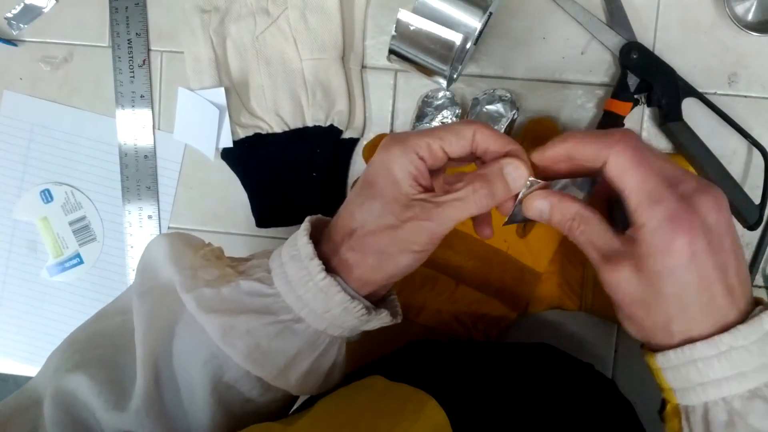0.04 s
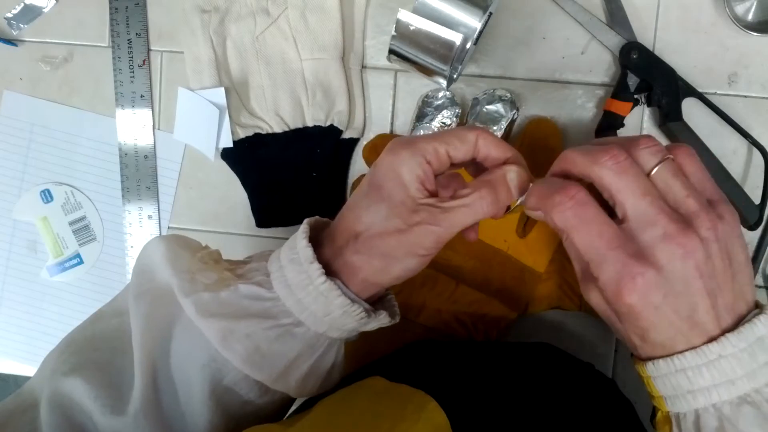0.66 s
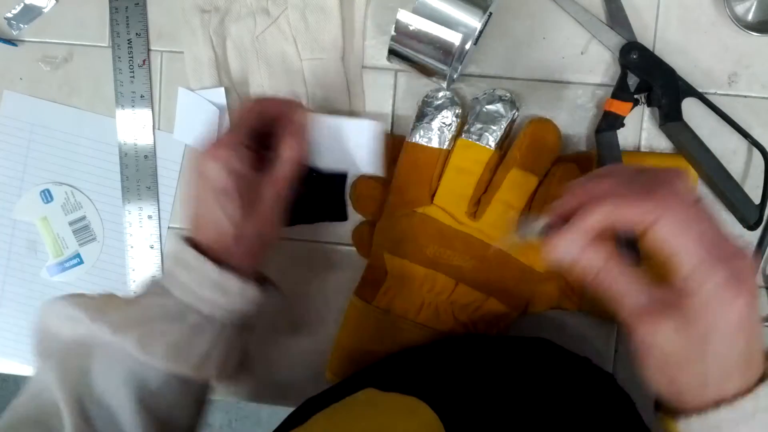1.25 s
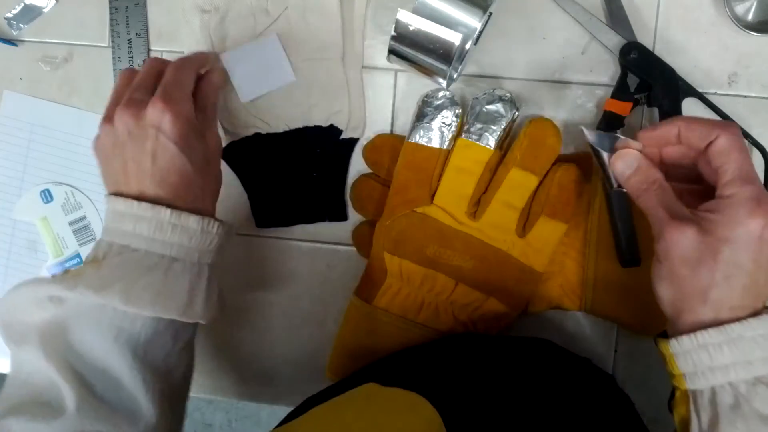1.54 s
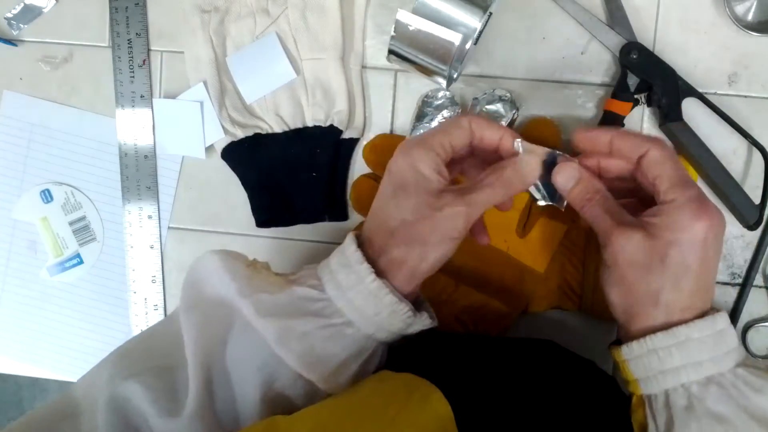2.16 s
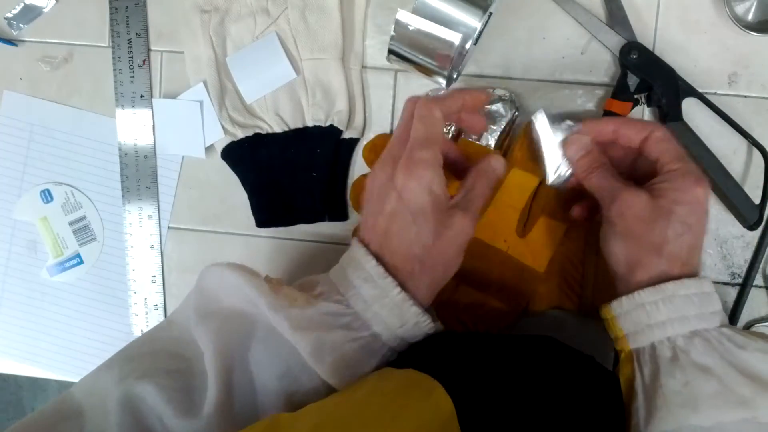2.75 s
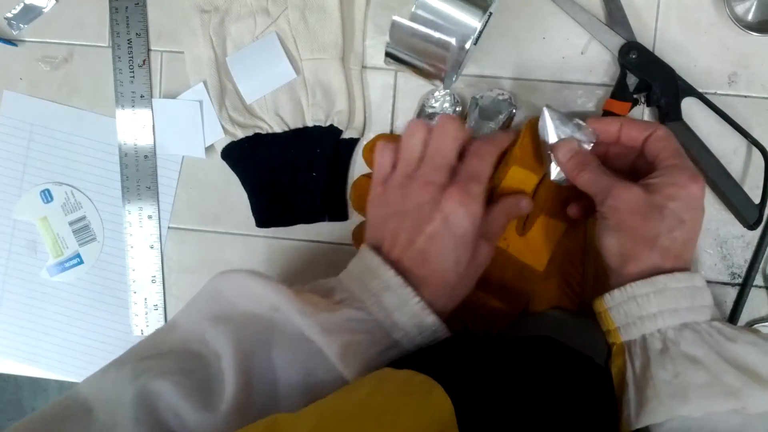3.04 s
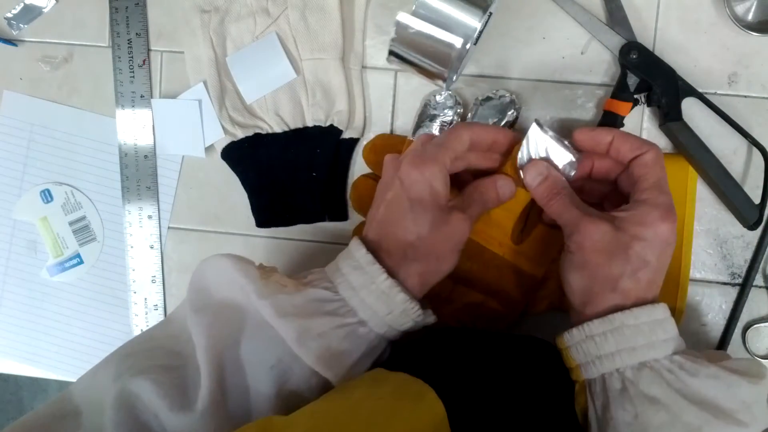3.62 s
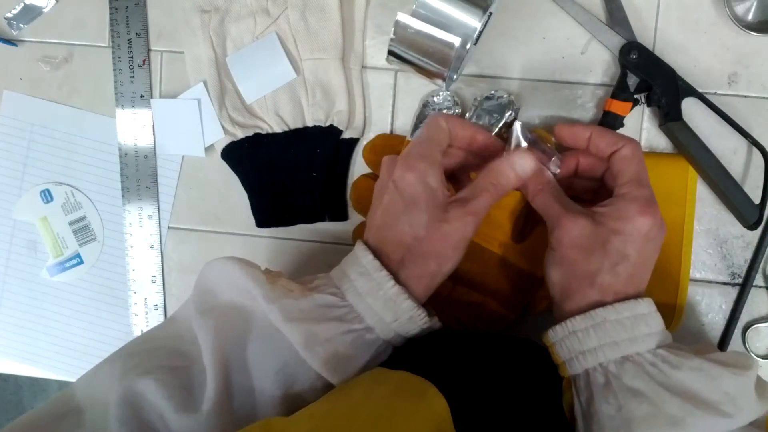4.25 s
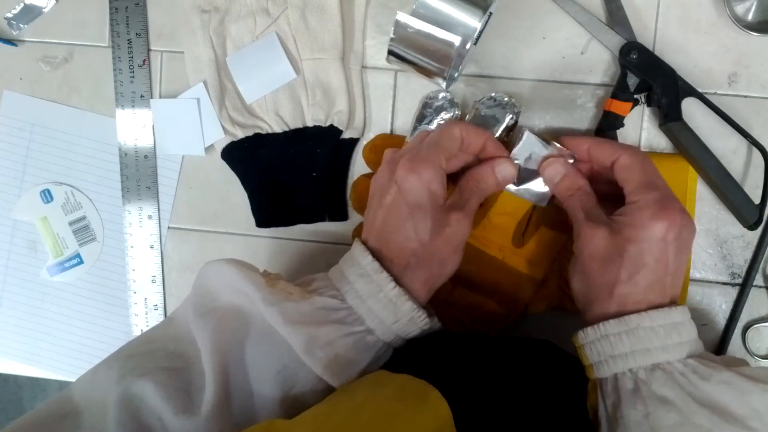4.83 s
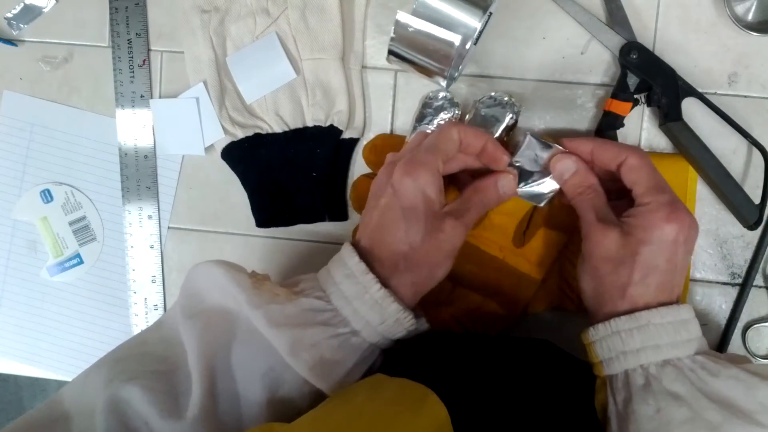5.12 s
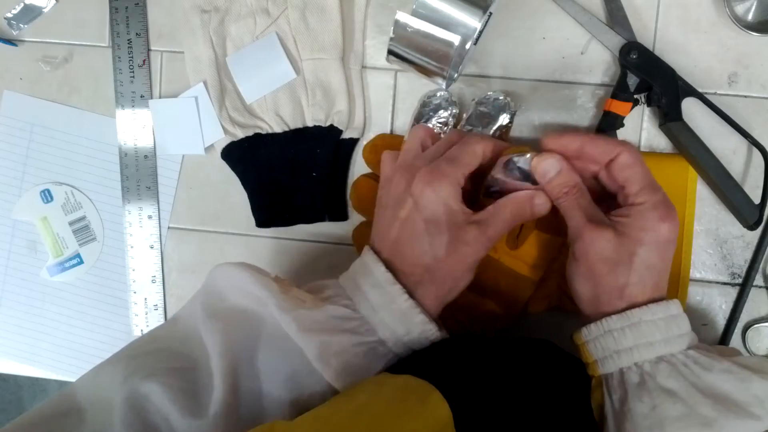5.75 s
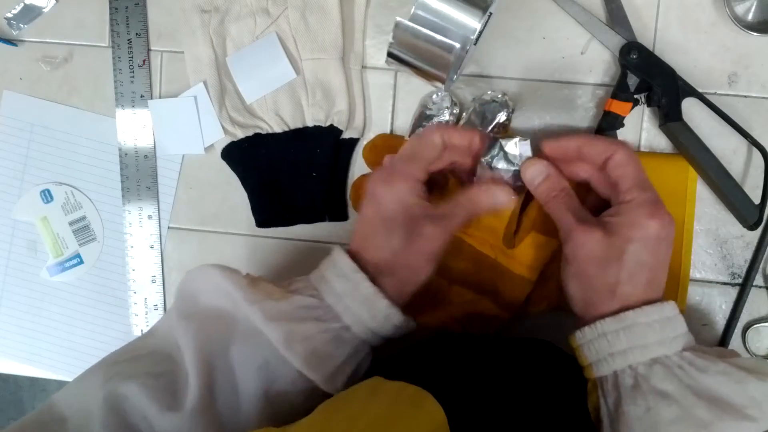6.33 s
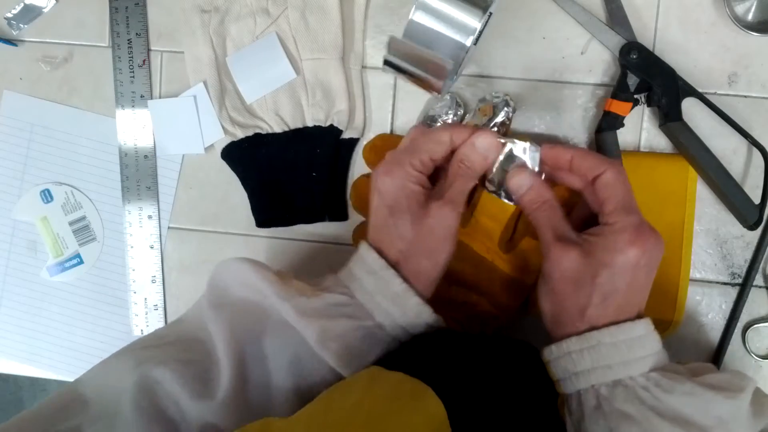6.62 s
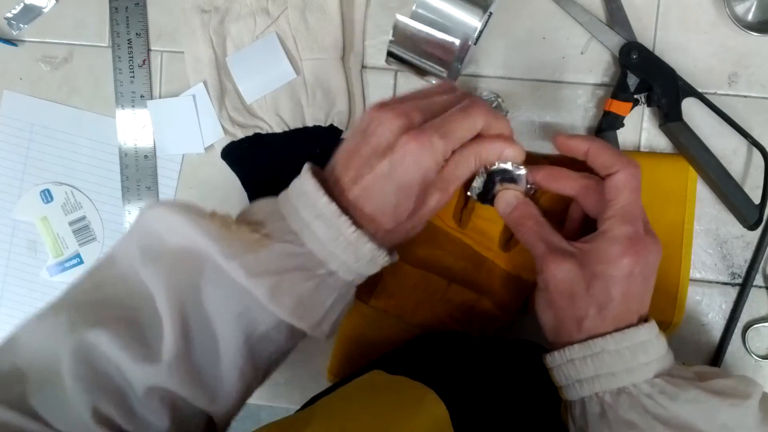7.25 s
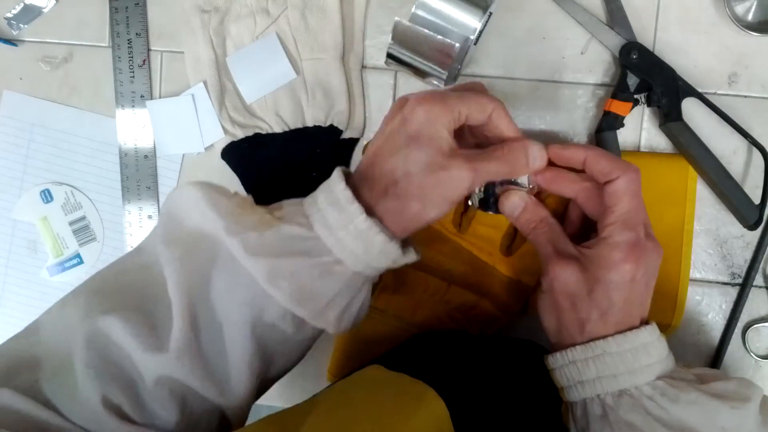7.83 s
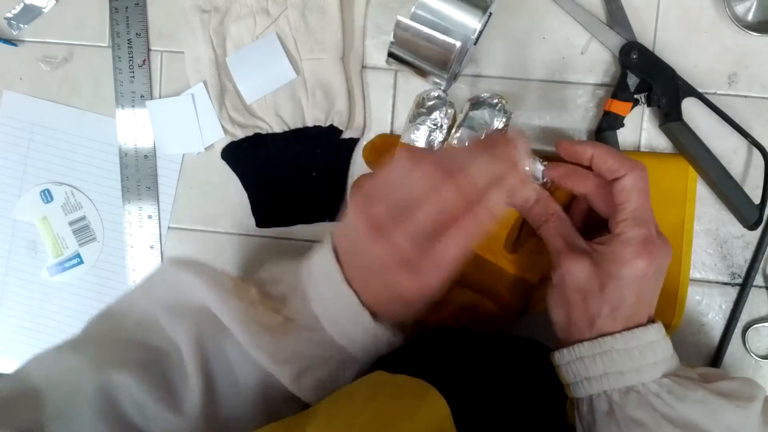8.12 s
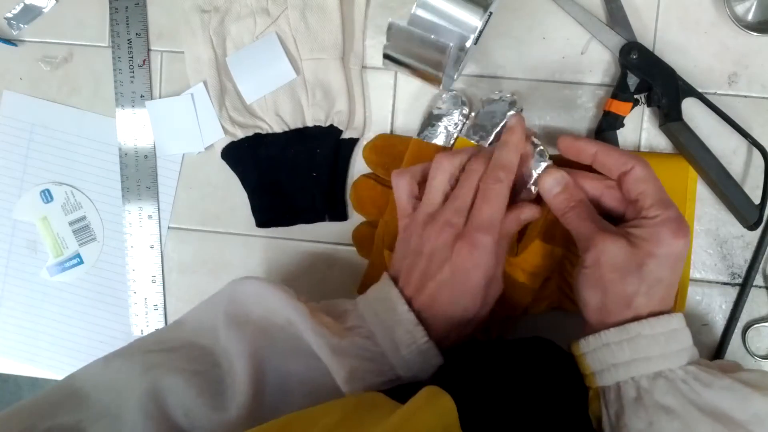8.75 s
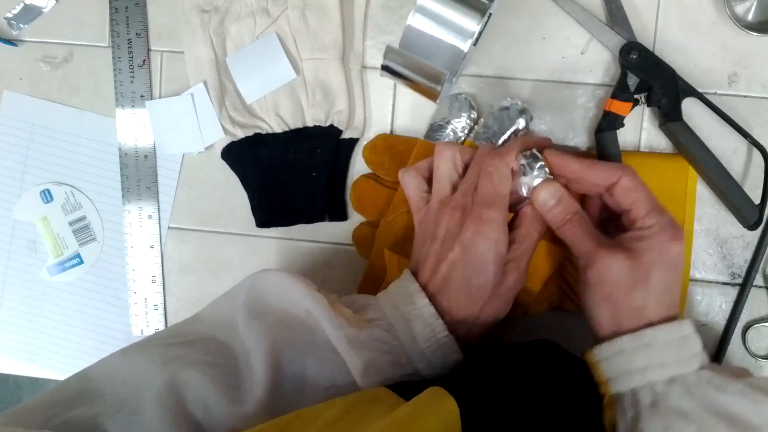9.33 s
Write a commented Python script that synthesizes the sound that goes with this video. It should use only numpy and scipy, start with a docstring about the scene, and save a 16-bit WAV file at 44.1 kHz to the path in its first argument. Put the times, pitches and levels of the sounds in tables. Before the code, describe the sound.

Foil tape crackles and snaps in irregular bursts as fingers peel it and press it onto a glove, over a steady low hum.

```python
"""Aluminium foil tape crackles as it is peeled from its backing and pressed round a work glove's fingertip.
Its creases strain and snap, and stroking fingers stick and slip in a stream of tiny clicks.
The fingers also tap dully, and the glove and sleeves rustle along. It all sounds close by,
in a small workroom that echoes briefly, over a mains hum and a soft rush of air."""
import sys
import numpy as np
from scipy import signal
from scipy.fft import rfft, irfft, next_fast_len
from scipy.io import wavfile

SR = 44100
rng = np.random.default_rng(int(sys.argv[2]) if len(sys.argv) > 2 else 0)


def persist_wave(psi):
    """Save psi, clipped to +-1, as 16-bit WAV."""
    counts = np.round(np.clip(psi, -1, 1) * 32767).astype(np.int16)
    wavfile.write(sys.argv[1], SR, np.atleast_2d(counts).T)


N = 413658

# The lowest ringing note of the loose tape, which changes with the grip.
# Each row: time in seconds, pitch in Hz.
TAPE_PITCH = [(1.08, 5300), (1.26, 4800), (1.91, 5400), (2.05, 3600), (2.66, 4000), (3.53, 5700),
              (4.41, 7300), (4.67, 4100), (5.36, 2600), (5.49, 2600), (5.67, 4200), (8.75, 3700)]
# The tone of a dull knock through the backing. Each row: frequency in Hz, relative level in dB.
KNOCK_TONE = [(200, -3), (450, 3.5), (620, 3), (950, 3.5), (1700, 2), (3000, -11)]
# The light brushing of hands that keep moving. Each row: time in seconds, relative level in dB.
HAND_MOTION = [(0, -67), (0.68, -74.5), (0.9, -59.5), (1.7, -60.5), (2.2, -55.5), (2.85, -59.5),
               (3.15, -56.5), (3.65, -58), (3.78, -62), (4.2, -68), (4.38, -58), (4.92, -63.5), (5.5, -61),
               (6.8, -60), (7.42, -67.5), (8.4, -57.5), (9.15, -61.5), (9.38, -54.5)]


def undb(db):
    """Turn decibels (dB) into a factor to multiply by."""
    return 10 ** (np.asarray(db) / 20)


def unit(x):
    """Scale a signal to an average (rms) level of 1."""
    return x / np.sqrt(np.mean(x ** 2) + 1e-20)


def curve(table):
    """Join rows of time and value with straight lines, giving one value per sample."""
    return np.interp(np.arange(N) / SR, *np.transpose(table))


def tone_db(tone, hz):
    """Read a tone table's level in dB at any frequency."""
    row_hz, db = np.transpose(tone)
    return np.interp(np.log(hz + 1), np.log(row_hz), db)


def with_tone(x, tone):
    """Filter a signal by a tone table."""
    size = next_fast_len(len(x))
    gain = undb(tone_db(tone, np.fft.rfftfreq(size, 1 / SR)))
    return irfft(rfft(x, size) * gain, size)[:len(x)]


def wander(rate):
    """Drift around zero, typically by 1.4, heading for a new random value `rate` times a second."""
    points = rng.standard_normal(2048)
    return 1.75 * np.interp(np.arange(N) / SR * rate, np.arange(len(points)), points)


def fade(t, t60):
    """Die away, falling 60 dB in t60 seconds."""
    return np.exp(-np.log(1000) * t / t60)


def clicks(per_s, spread_db, limit=9.1):
    """Surfaces stick, then slip with a click at random moments: many small, a few large."""
    sizes = undb(spread_db * np.minimum(rng.exponential(size=N), limit))
    return unit((rng.random(N) < per_s / SR) * sizes * rng.choice([-1, 1], N))


def background(air_db=-56.5):
    """An appliance hums at twice the mains frequency, wavering slightly, over a soft rush of air."""
    # The notes of the hum. Each row: frequency in Hz, average level in dB.
    hum_notes = [(120.0, -52), (240.0, -72)]
    # The air, with a faint whistle near 1300 Hz. Each row: frequency in Hz, relative level in dB.
    air_tone = [(32, -2), (48, -3.5), (95, -5.5), (150, -16.5), (255, -15.5), (520, -23), (1050, -29.5),
                (1270, -21.5), (1480, -32), (2500, -37), (14000, -39)]
    t = np.arange(N) / SR
    hum = sum(np.sqrt(2) * undb(db) * np.sin(2 * np.pi * (hz * t + rng.random())) for hz, db in hum_notes)
    hum *= undb(-0.2 * wander(2.9))
    return hum + undb(air_db) * unit(with_tone(rng.standard_normal(N), air_tone))


def room(x, near_db=-11, walls_db=-15, low_t60=0.34, treble_t60=0.1, split_hz=7000):
    """Hands and bench bounce the sound back at once; the walls add an echo whose treble dies first."""
    t = np.arange(SR // 2) / SR
    near = rng.standard_normal(len(t)) * fade(t, .035) * (t > .002)
    filters = [signal.butter(2, split_hz, kind, fs=SR, output="sos") for kind in ("low", "high")]
    low, treble = (signal.sosfilt(sos, rng.standard_normal(len(t))) for sos in filters)
    walls = (low * fade(t, low_t60) + treble * fade(t, treble_t60)) * (t > .006)
    echo = undb(near_db) * near / np.linalg.norm(near) + undb(walls_db) * walls / np.linalg.norm(walls)
    return x + signal.fftconvolve(x, echo)[:N]


def strokes(grip_s=0.0077, let_go_s=0.032, ease_db=4):
    """Fingers grip, press hardest midway and let go. Returns their power, and power times brightness."""
    # Strokes that peel and smooth the tape. Each row: start in seconds, seconds until letting go,
    # relative level in dB, brightness (treble slope) in dB per octave.
    finger_strokes = [(0.486, 0.051, -47.5, 17), (0.8, 0.13, -51, 9), (1.249, 0.029, -59, -8.5),
                      (1.363, 0.042, -53.5, 7), (2.062, 0.04, -32.5, 6.5), (2.096, 0.09, -37, 7.5),
                      (2.195, 0.091, -37, 6), (2.331, 0.065, -43.5, 5), (2.49, 0.23, -50, 8),
                      (2.696, 0.016, -35, 5.5), (2.913, 0.016, -46, 4), (2.984, 0.033, -44, 10.5),
                      (3.53, 0.09, -57, 9), (3.627, 0.0091, -42.5, 9), (4.257, 0.063, -46, 9.5),
                      (4.582, 0.16, -49.5, 7.5), (5.002, 0.14, -49.5, 9.5), (5.328, 0.029, -45.5, 7),
                      (5.625, 0.12, -51, 4), (5.799, 0.076, -47, 10), (6.199, 0.026, -51, 7),
                      (6.317, 0.046, -43, 8.5), (6.422, 0.14, -45, 10), (6.553, 0.057, -44, 10),
                      (6.633, 0.058, -42.5, 8.5), (6.976, 0.081, -53, 13), (7.164, 0.072, -38.5, 13),
                      (7.524, 0.052, -53.5, 7.5), (7.818, 0.18, -46, 13), (8.144, 0.12, -39.5, 12.5),
                      (8.271, 0.071, -39, 9), (8.392, 0.081, -41.5, 11), (8.593, 0.037, -45, 7),
                      (8.757, 0.083, -51, 11), (8.882, 0.018, -49, 9), (8.997, 0.034, -45.5, 14),
                      (9.322, 0.028, -52, 19)]
    t = np.arange(N) / SR
    power, weighted_brightness = np.zeros(N), np.zeros(N)
    for start, length, db, brightness in finger_strokes:
        span = slice(int(start * SR), int((start + length + let_go_s) * SR))
        age = t[span] - start
        contact = np.clip(age / grip_s, 0, 1) * np.clip(1 - (age - length) / let_go_s, 0, 1)
        from_middle = 2 * age / (length + let_go_s) - 1
        stroke_power = (contact * undb(db - ease_db * from_middle ** 2)) ** 2
        power[span] += stroke_power
        weighted_brightness[span] += stroke_power * brightness
    return power, weighted_brightness


def glove(cloth_db=-5.5, drag_db=-24):
    """Leather and sleeves rustle in dull, dense clicks as the hands move; strokes drag them along."""
    # The tone of the cloth. Each row: frequency in Hz, relative level in dB.
    cloth_tone = [(150, -27), (350, -0.5), (700, -0.5), (1400, -1.5), (2400, -5.5), (5000, -10)]
    stroke_power, _ = strokes()
    level = np.sqrt(undb(curve(HAND_MOTION) + cloth_db) ** 2 + stroke_power * undb(drag_db) ** 2)
    rustle = unit(with_tone(clicks(per_s=2100, spread_db=1), cloth_tone))
    flutter = undb(2 * wander(35))
    return rustle * level * flutter


def taps(t60=0.065):
    """A fingertip lands on tape or glove: a dull knock without a snap."""
    # The taps. Each row: start in seconds, starting level in dB.
    finger_taps = [(1.099, -43.5), (2.082, -39.5), (5.4106, -47), (7.216, -48), (7.245, -52.5),
                   (9.0364, -47.5)]
    t = np.arange(2048) / SR
    out = np.zeros(N + len(t))
    for s, db in finger_taps:
        start = int(s * SR)
        knock = unit(with_tone(rng.standard_normal(len(t)), KNOCK_TONE))
        out[start:start + len(t)] += undb(db) * knock * fade(t, t60)
    return out[:N]


def foil(push, brightness, flex_db):
    """The sheet turns a push into sound in 12 overlapping bands; flexing shifts each by flex_db()."""
    # The tone of the foil. Each row: frequency in Hz, relative level in dB.
    foil_tone = [(900, -25.5), (2300, -13), (3700, -4), (5400, -5), (7300, -2.5), (9800, -5), (13000, -2.5),
                 (16000, -5.5)]
    size = next_fast_len(len(push))
    spectrum = rfft(push, size)
    octave = np.log2(np.fft.rfftfreq(size, 1 / SR) + 1)
    out, power = 0, 0
    for hz in 15000 / 2 ** (np.arange(12) / 3):
        band = np.maximum(1 - 3 * abs(octave - np.log2(hz)), 0)
        # bending a thin sheet changes mostly its treble
        db = tone_db(foil_tone, hz) + brightness * np.log2(max(hz, 3500)) + flex_db()
        gain = np.sqrt(band.sum()) * undb(db)
        out += gain * unit(irfft(spectrum * band, size)[:len(push)])
        power += gain ** 2
    return out / np.sqrt(power)


def rubbing(gain_db=-1.5, brush_brightness=8.5, hiss=0.57, sing_db=-19, sing_width_hz=500, stray_db=-7):
    """Glue strands and fingertips let go in tiny clicks: loud in strokes, faint as the hands brush."""
    brush_power = undb(curve(HAND_MOTION)) ** 2
    stroke_power, weighted_brightness = strokes()
    power = brush_power + stroke_power
    brightness = (brush_power * brush_brightness + weighted_brightness) / power
    slips = clicks(per_s=3000, spread_db=2.5, limit=4) + hiss * rng.standard_normal(N)
    slips *= undb(2 * wander(110))  # a fast judder
    wrinkle_pops = .7 * clicks(per_s=130, spread_db=4.5, limit=3)
    # light brushing is mostly an even whisper; firm strokes crackle
    whisper_share = .8 * brush_power / power
    crackle = np.sqrt(1 - whisper_share) * unit(slips + wrinkle_pops)
    whisper = np.sqrt(whisper_share) * rng.standard_normal(N)
    # small creases let go at random while the tape is handled
    strays = clicks(per_s=12, spread_db=3, limit=2.5) * np.sqrt(brush_power / power)
    scrape = foil(crackle + whisper + undb(stray_db) * strays, brightness, lambda: 2 * wander(30))
    # slow, dull strokes also set the loose tape singing
    swell = unit(signal.sosfilt(signal.butter(2, sing_width_hz, fs=SR, output="sos"), slips))
    note = np.sin(2 * np.pi * np.cumsum(curve(TAPE_PITCH)) / SR)
    singing = swell * note * undb(sing_db - 2.1 * (brightness - brush_brightness))
    return (scrape + singing) * np.sqrt(power) * undb(gain_db)


def creases(ticks_per_s=700, build_up_s=0.006, shiver_t60=0.045, knock_t60=0.048, ring_t60=0.03):
    """A crease snaps in a run of tiny buckles; the longer the run, the more the whole sheet shivers."""
    # The snapping creases. Each row: time in seconds, level of the crack in dB,
    # relative length, brightness (treble slope) in dB per octave.
    snaps = [(0.712, -34.5, 0.8, 17.5), (1.076, -24.5, 3.2, 6), (1.2242, -42.5, 2.1, 5),
             (1.2573, -39, 5, 1.5), (1.5447, -32.5, 1.9, 1), (1.906, -28.5, 2.4, 0.5),
             (2.0437, -19.5, 4.3, 8.5), (2.076, -20.5, 1.1, 8.5), (2.0821, -22.5, 1, 7.5),
             (2.2669, -36, 3.1, 0), (2.2928, -29, 1.6, 10), (2.4536, -30, 2.2, 12), (2.4579, -27, 2.5, 10),
             (2.465, -25.5, 5.8, 7.5), (2.4946, -19, 12, 8), (2.594, -29.5, 4.7, 2), (2.655, -28, 2.9, 6),
             (2.6596, -25, 4.1, 3), (3.4909, -31.5, 2.3, 4.5), (3.5274, -27, 2.5, 5.5),
             (3.886, -50, 1.4, -4.5), (3.928, -51.5, 1.8, -2.5), (4.3285, -30, 1.1, 6),
             (4.363, -21.5, 1.7, 10), (4.4018, -24.5, 0.82, 10.5), (4.4138, -31.5, 0.9, 8),
             (4.4175, -27, 3, 9), (4.544, -35, 1.3, 9.5), (4.5633, -29.5, 1.1, 5.5), (4.669, -27, 1.3, 6),
             (4.692, -36, 2.1, 3), (4.753, -25.5, 0.67, 10.5), (5.1321, -33, 2.4, 9.5),
             (5.3593, -31, 2.8, 3), (5.4832, -24.5, 2.9, 7), (5.6188, -23.5, 1.7, 11),
             (5.8318, -37, 0.88, 11), (5.97, -53, 2.7, -2), (6.4188, -38.5, 0.55, 11),
             (6.461, -33, 0.52, 12), (6.4757, -31, 1, 10), (6.907, -36.5, 0.51, 15),
             (7.002, -45.5, 2.7, 5.5), (7.0985, -39.5, 0.53, 6.5), (8.1926, -22, 7.1, 10.5),
             (8.6362, -38, 0.95, 4.5), (8.7542, -29, 0.85, 5), (9.036, -34, 0.4, 17)]
    t = np.arange(-1152, 1920) / SR  # the crease gives way at t = 0
    snap_moment = (t > -.0005) & (t < .0035)
    at_level = lambda x, db: undb(db) * x / x[snap_moment].std()
    out = np.zeros(N + len(t))
    for s, db, length, brightness in snaps:
        run_s = length * 0.00082
        buckles, shiver, thud = rng.standard_normal((3, len(t))) * (t >= 0)
        buckles = buckles * np.sqrt(abs(buckles)) * np.exp(-(t / run_s) ** 2)
        shiver = shiver * undb(-14) * length / 2 * fade(abs(t), shiver_t60)
        # the fold ticks faintly just before it gives, long folds the loudest
        ticks = rng.standard_normal(len(t)) * (rng.random(len(t)) < ticks_per_s / SR) * (t < 0)
        strain = ticks * np.exp(-abs(t) / build_up_s) * undb(-3.5) * length / 2
        crack = foil(strain + buckles + shiver, brightness, lambda: 2 * rng.standard_normal())
        # the backing knocks and the loose tape rings at four close pitches, both more for dull snaps
        knock = with_tone(thud * fade(abs(t), knock_t60), KNOCK_TONE)
        ring_hz = np.interp(s, *np.transpose(TAPE_PITCH)) * (1 + 0.053 * rng.standard_normal((4, 1)))
        ring = np.sin(2 * np.pi * ring_hz * np.maximum(t, 0)).sum(axis=0) * fade(abs(t), ring_t60)
        knock_db = db - 13.5 - 1.63 * brightness
        ring_db = db - 13 - 1.46 * brightness
        snap = at_level(crack, db) + at_level(knock, knock_db) + at_level(ring, ring_db)
        start = int((s + t[0]) * SR)
        out[start:start + len(t)] += snap
    return out[:N]


def scene():
    """The tape and hands in the room, plus hum and air, as one channel."""
    handwork = creases() + taps() + rubbing() + glove()
    return (room(handwork) + background())[None]


def record(dry, top_hz=15800):
    """A steep filter cuts off the highest treble."""
    return signal.sosfilt(signal.ellip(10, .2, 70, top_hz, fs=SR, output="sos"), dry)


dry = scene()
out = record(dry)
persist_wave(out)
```